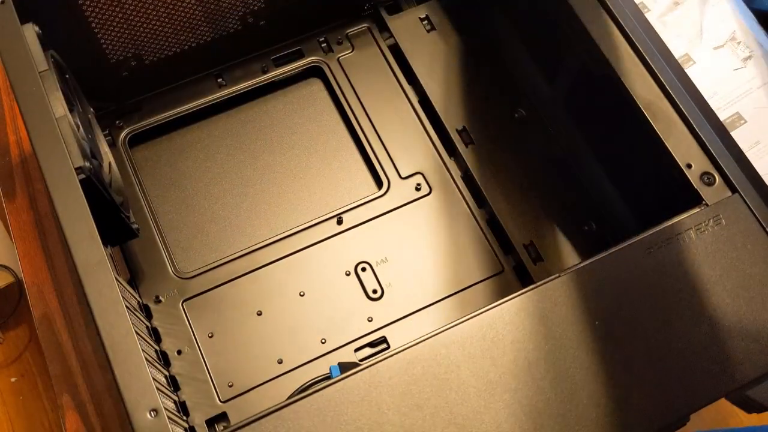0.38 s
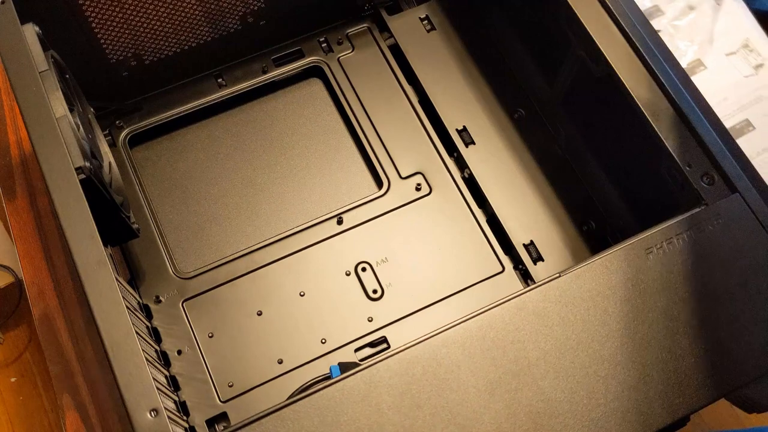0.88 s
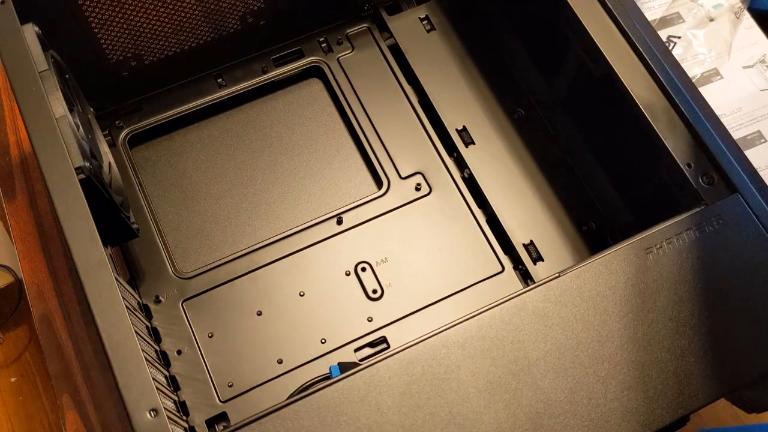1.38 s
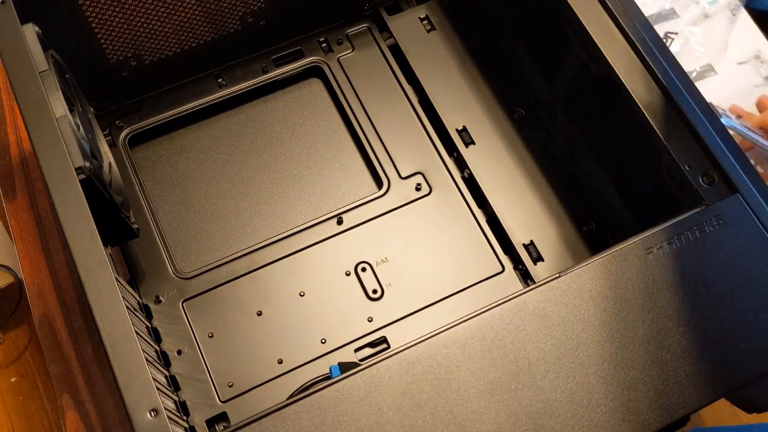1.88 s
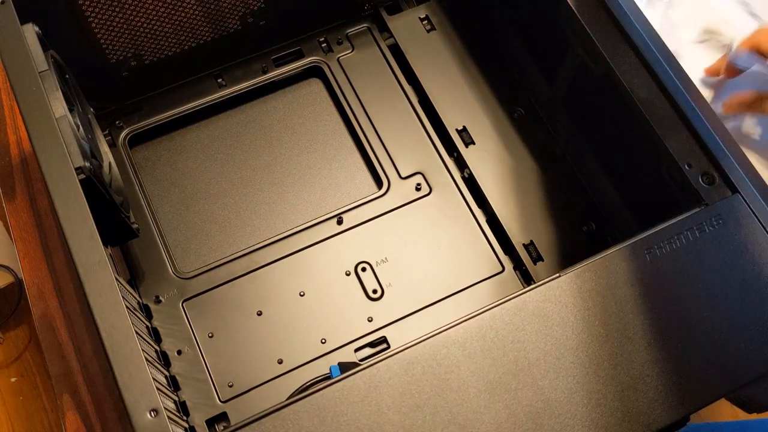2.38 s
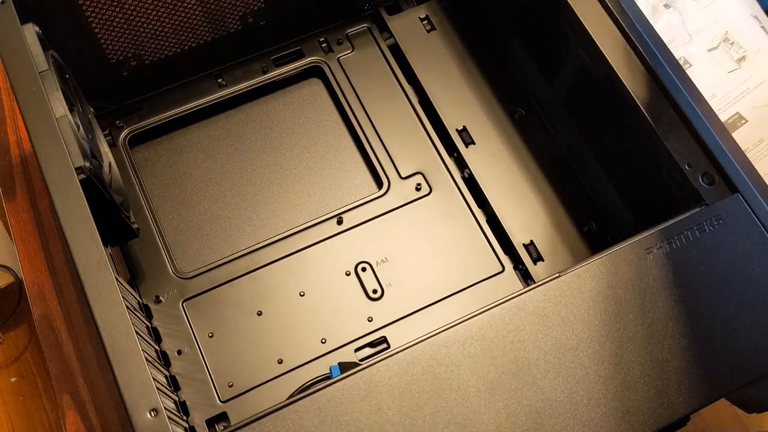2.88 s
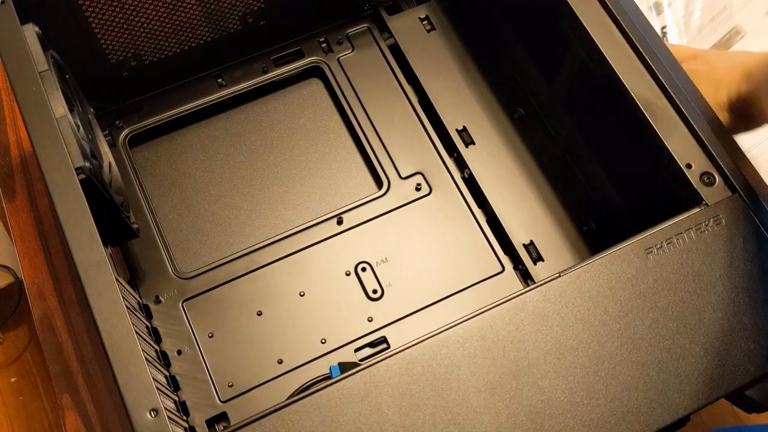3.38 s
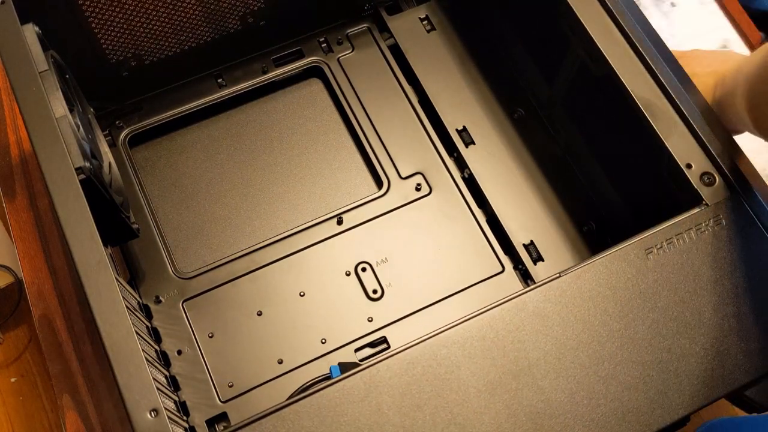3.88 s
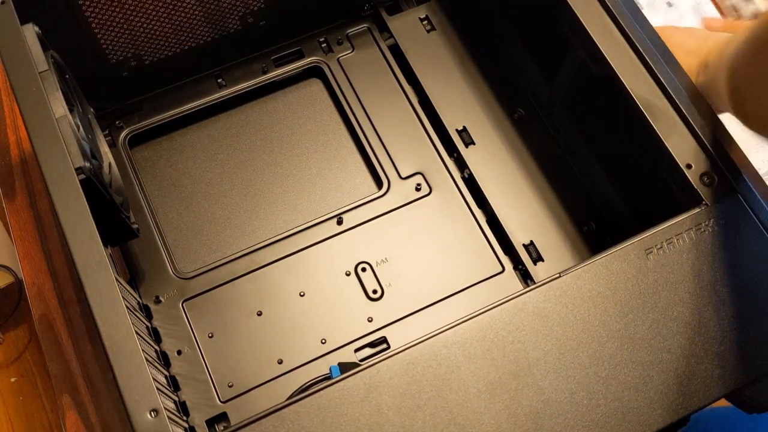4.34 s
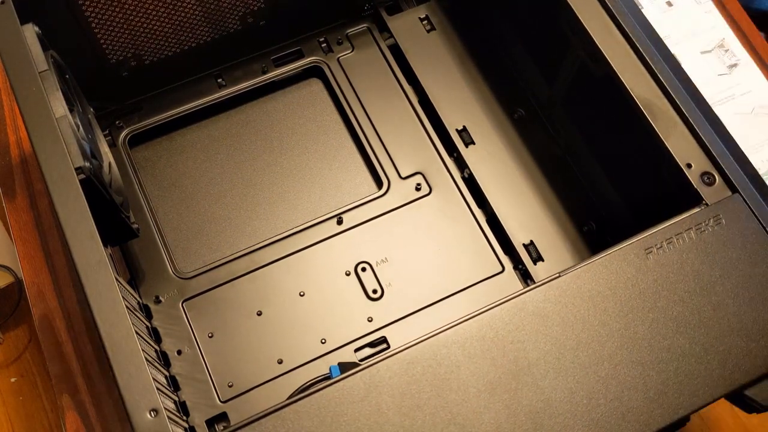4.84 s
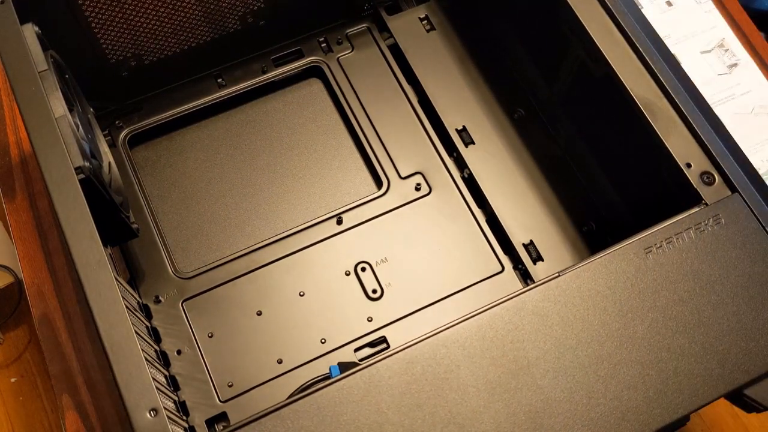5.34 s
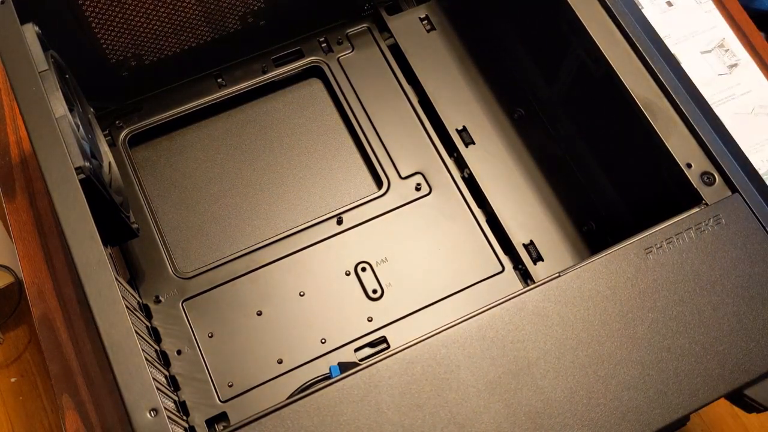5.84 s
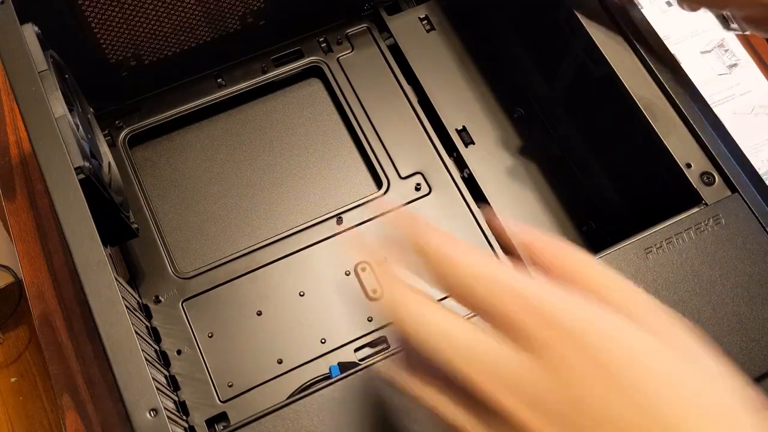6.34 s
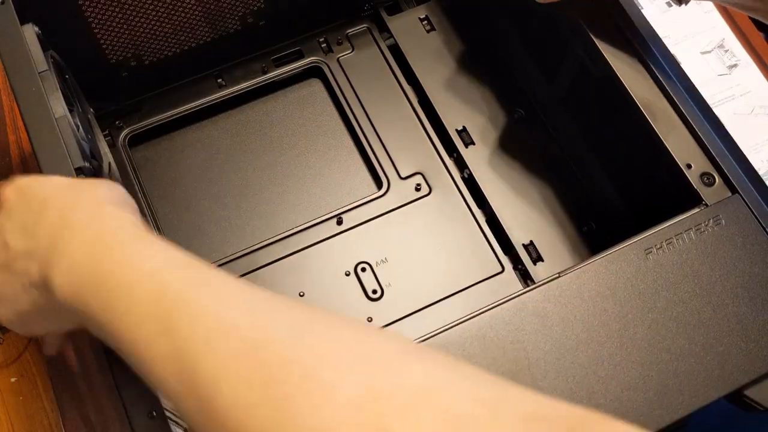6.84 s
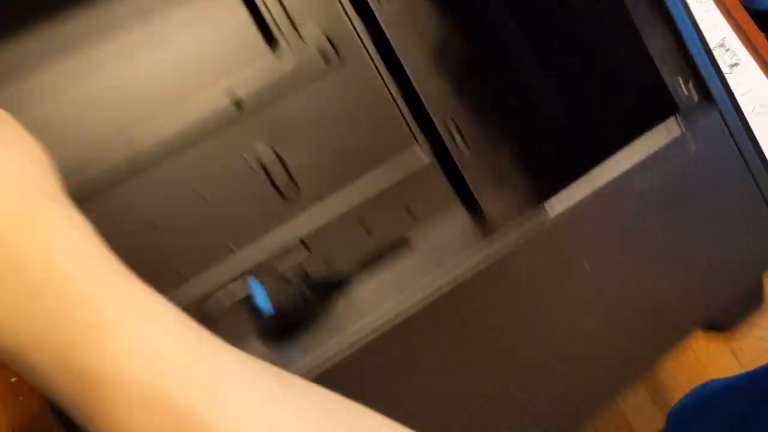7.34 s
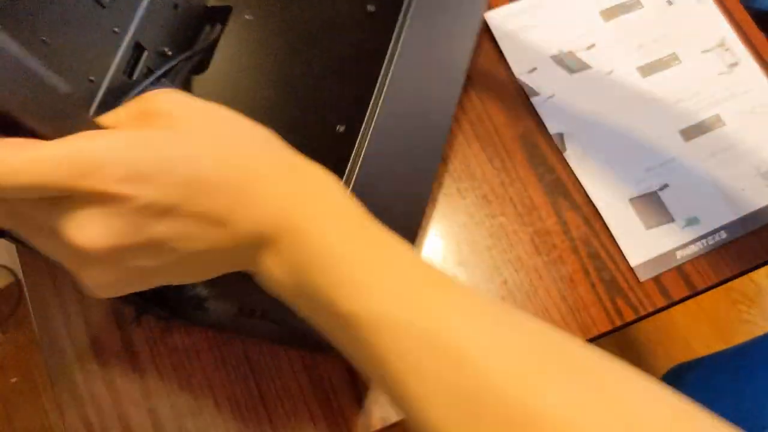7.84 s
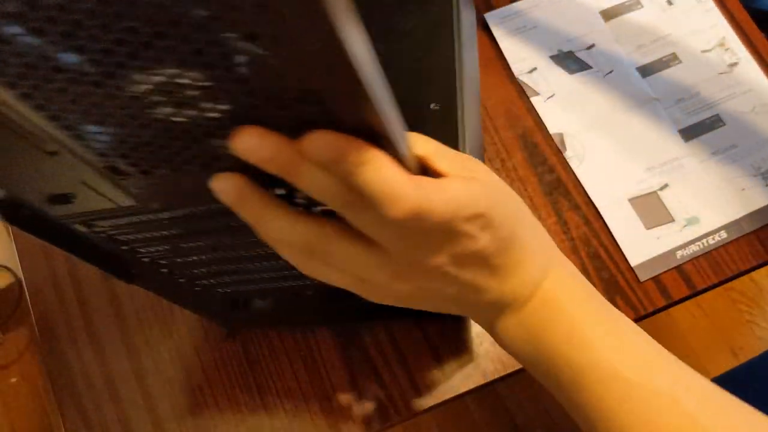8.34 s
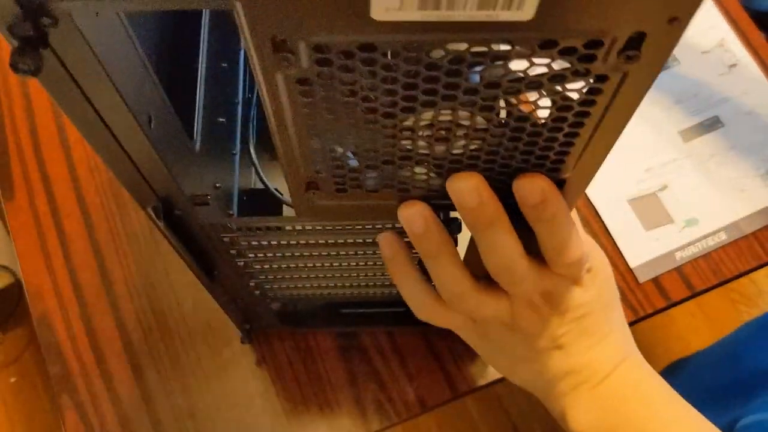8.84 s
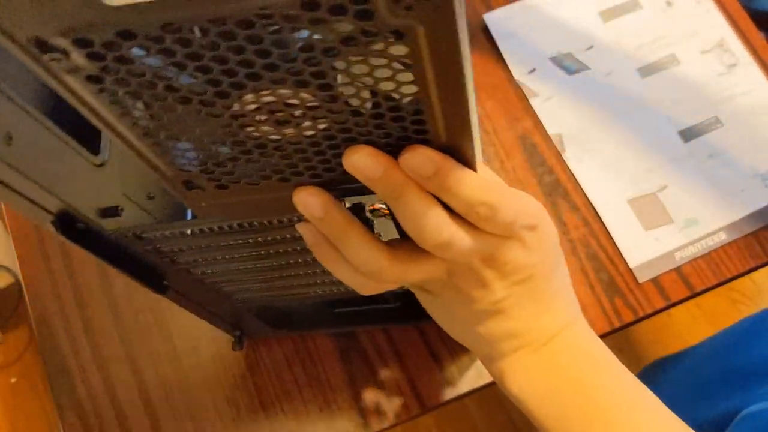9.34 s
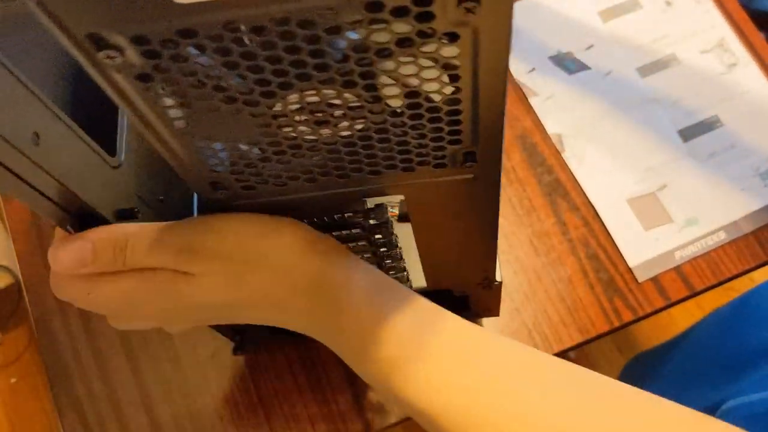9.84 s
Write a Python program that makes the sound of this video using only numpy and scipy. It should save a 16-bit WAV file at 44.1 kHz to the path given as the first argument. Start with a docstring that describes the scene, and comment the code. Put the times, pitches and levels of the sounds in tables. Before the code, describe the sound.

Near-quiet opens with faint rustling, then crisp taps, paper crackle and brief drags on a table. The activity thins to soft rustles. Then hollow steel knocks and a growing scrape lead to one heavy thud with clattering panels and deep table resonance, followed by lighter bumps and fading slides. Close stereo pickup in a small room with short echo and low room noise.

```python
"""On a wooden table in a small room lies a steel computer case; a hand beside it shuffles paper and small parts.
Then two hands grip the case, scrape it round and tip it upright: it thumps down, rings and is nudged into place.
Taps and knocks are noise bursts with one strong ring; rustles and scrapes are noise and random slips that swell
and fade. Ringing tones make the steel panels and the table. A low hum and room noise lie behind it all.
A phone just above the case hears it through two ports."""
import sys
import numpy as np
from scipy import signal
from scipy.fft import rfft, irfft
from scipy.io import wavfile
from scipy.ndimage import uniform_filter1d

SR = 44100
rng = np.random.default_rng(int(sys.argv[2]) if len(sys.argv) > 2 else 0)


def ratio(d):
    """dB to gain"""
    e = np.asarray(d, float) / 20
    return 10 ** e


def generate_wav(signal):
    """Clip the signal to [-1, 1] and save it as 16-bit WAV at the path in sys.argv[1]."""
    frames = np.transpose(np.atleast_2d(signal))
    scaled = np.clip(frames, -1, 1) * 32767
    pcm = np.round(scaled).astype(np.int16)
    wavfile.write(sys.argv[1], SR, pcm)


N = 439236  # samples
T = np.arange(N) / SR  # seconds
GRIP_S, LANDING_S = 6.95, 7.86  # the hands take the case; it lands on its end


def level(x, db):
    """Scale a sound to an rms level in dB."""
    return x * ratio(db) / np.sqrt(np.mean(x ** 2))


def shape(x, table, to=ratio):
    """Weight the spectrum by a table of Hz and value, joined on a log-frequency axis."""
    hz, value = np.transpose(table)
    log_hz = np.log(np.fft.rfftfreq(x.shape[-1], 1 / SR) + 1)
    gain = to(np.interp(log_hz, np.log(hz), value))
    return irfft(rfft(x) * gain, x.shape[-1])


def walk(rate):
    """Random levels held 1 / rate seconds and smoothed twice; their spread is near 1."""
    hold = int(SR / rate)
    steps = np.repeat(rng.standard_normal(N // hold + 1), hold)
    return 1.53 * uniform_filter1d(uniform_filter1d(steps, hold), hold)[:N]


def swells(rows, lift_db=0):
    """Each movement swells from silence to its peak, then fades steadily; their powers add."""
    start, peak_db, rise, fade = np.transpose(rows)[:4, :, None]
    t = T[::32]  # a coarse clock is enough for slow swells
    up = np.clip((t - start) / rise, 0, 1) ** 1.5
    fall_db = 30 * np.maximum(t - start - rise, 0) / fade  # falls 30 dB in one fade time
    power = np.sum((up * ratio(peak_db + lift_db - fall_db)) ** 2, axis=0)
    return np.interp(T, t, np.sqrt(power))


def ring(x, modes):
    """A bank of damped tones, like a struck body; a unit push starts each at its own level."""
    out = 0
    for hz, db, t60 in modes:
        radius = np.exp(-np.log(1000) / (t60 * SR))
        turn = 2 * np.pi * hz / SR
        resonator = [1, -2 * radius * np.cos(turn), radius * radius]
        out = out + ratio(db) * signal.lfilter([0, np.sin(turn)], resonator, x)
    return out


# Colour of the noise as surfaces touch. Each row: frequency in Hz, relative level in dB per Hz.
CONTACT_COLOUR = [(120, -76), (300, -28), (700, -4), (1800, 9), (4000, -10.5), (6000, -18), (12000, -30)]


def blows(rows, tick_colour, ring_share, t60):
    """Each blow: a bright tick, a noisy contact with one strong ring, a push into the table."""
    crack, push = np.zeros(N), np.zeros(N)
    t = T[:SR // 4]
    for start, contact_db, tick_db, thud_db, hz in rows:
        noise = rng.standard_normal((3, len(t)))
        fade = np.exp(-np.log(1000) * t / t60) * np.minimum(t / 0.0012, 1)
        tick = level(shape(noise[0], tick_colour), tick_db + 2.5) * fade ** 2
        contact = level(shape(noise[1], CONTACT_COLOUR), contact_db - 10.0) * fade
        tone = ring_share * ratio(contact_db) * np.sin(2 * np.pi * hz * t) * fade ** .7
        soft_push = ratio(thud_db) * np.exp(-t / .001) * (1 + .6 * noise[2]) / (.005 * SR)
        i = int(start * SR)
        n = min(len(t), N - i)
        crack[i:i + n] += (tick + contact + tone)[:n]
        push[i:i + n] += soft_push[:n]
    return crack, push


# Blows on the case. Each row: start in seconds, contact, tick and thud in dB (settings that blows() scales),
# strongest ring in Hz.
CASE_KNOCKS = [(6.656, -31, -55, -46, 540), (6.708, -45, -57, -44, 734), (6.907, -34.5, -65, -53, 1340),
               (7.094, -41, -40, -52, 4200), (7.121, -31, -42.5, -41, 1380), (7.149, -42, -56, -46, 581),
               (7.275, -19, -46, -56, 1225), (7.317, -15, -55, -50, 1200), (7.366, -11, -32, -57, 1640),
               (7.574, -54, -45, -48, 750), (7.674, -31, -47, -46, 437), (7.799, -36, -55, -52, 480),
               (7.877, -5, -21, -9, 793), (7.933, -15.5, -36, -15, 443), (8.118, -36, -36, -39, 970),
               (8.581, -42, -44.5, -50.5, 1245), (8.832, -25, -35.5, -27, 957),
               (8.872, -18.5, -58, -24, 880), (9.028, -49, -60, -19.5, 581),
               (9.061, -23.5, -37.5, -39, 789), (9.208, -39, -71, -42, 840), (9.549, -53, -54, -47, 650),
               (9.823, -39.5, -49, -49, 1248)]


def knocks():
    """Heavy steel knocks whose contact takes longer to die away than that of light parts."""
    return blows(CASE_KNOCKS, GRIP_COLOUR, ring_share=0.33, t60=0.058)


# Steel panels. Each row: frequency in Hz, relative level in dB, time to fall 60 dB in seconds.
CASE_MODES = [(443, -6.5, 0.2), (480, -8.5, 0.38), (634, -12.5, 0.1), (770, -10, 0.28), (900, -11, 0.052),
              (952, -4.5, 0.074), (1060, -11, 0.095), (1240, -11, 0.17), (1320, -12, 0.082),
              (1452, -14, 0.15), (1640, -23, 0.066), (1870, -29, 0.11), (2080, -10, 0.1), (2310, -20, 0.27),
              (2630, -44, .15), (2920, -40, 0.15), (3200, -38, 0.099), (3060, -38, 0.14), (3420, -17, 0.1),
              (3840, -51, .15)]


def case_panels(x, db):
    """The steel panels of the case ring when pushed."""
    return ratio(db) * ring(x, CASE_MODES)


# Small parts and paper on the table. Each row: start in seconds, contact, tick and thud in dB
# (settings that blows() scales), ring in Hz.
PART_TAPS = [(0.819, -32, -35.5, -55, 870), (0.892, -29, -29.5, -32.5, 1100), (1.039, -13, -12, -47, 799),
             (1.335, -23.5, -29.5, -50, 1095), (1.608, -25, -34, -49, 770), (1.867, -39, -48, -46, 1470),
             (1.889, -18, -13.5, -43, 1360), (1.989, -25, -26, -48, 810), (2.057, -23.5, -28, -33, 960),
             (2.164, -30, -54, -49, 820), (2.341, -29, -32, -53, 1170), (2.386, -25.5, -45, -32.5, 635),
             (2.475, -31, -57, -33.5, 910), (2.607, -26, -64, -32.5, 1320), (2.678, -29, -53, -34, 606),
             (2.798, -29, -50, -33, 600), (2.86, -40, -73, -39, 634), (2.906, -36, -71, -66, 785),
             (2.963, -14, -63, -29, 1600), (3.017, -13, -54, -50, 770), (3.224, -37, -49, -33, 985),
             (3.357, -24, -27, -52, 640), (3.478, -35, -50, -40, 2500), (3.542, -17.5, -50, -35, 2210),
             (3.595, -34, -56, -33, 1150), (3.83, -22.5, -46, -24, 1200), (3.857, -21, -38, -23, 1650),
             (4.294, -41, -57, -57, 2020), (4.494, -27, -36, -53, 2780), (4.561, -34, -39, -48, 1070),
             (4.611, -42, -24, -50, 2020), (4.705, -48, -42, -59, 1640), (4.772, -33, -27, -61, 2640),
             (4.79, -44, -25, -51, 2580), (4.806, -36, -31, -52, 2490), (4.917, -50, -34, -62, 3020),
             (4.931, -28, -29, -52, 1920), (5.416, -39, -34.5, -50, 820), (6.064, -37.5, -59, -30, 690)]


def taps():
    """Light parts click and tap, with a short contact and a papery tick."""
    return blows(PART_TAPS, PAPER_COLOUR, ring_share=0.45, t60=0.024)


# Short creaks. Each row: middle in seconds, peak in dB, pitch in Hz, length in seconds.
CREAK_TONES = [(0.9, -42, 2800, .02), (1.65, -44, 700, .05), (2.404, -41, 630, .067), (5.43, -48, 775, .04),
               (7.371, -20, 1640, .015), (7.388, -27, 412, .025), (8.122, -23, 200, .035),
               (8.203, -36, 1215, .03), (9.331, -38, 1220, .018)]
# The thin panel sings after the heavy landing, then again as the case slides.
# Each row: start in seconds, peak in dB, rise in seconds, fade in seconds.
PANEL_SONG = [(7.877, -44, .004, .4), (8.08, -46, .18, .25), (8.3, -57, .08, .55)]


def creaks():
    """Brief tones from a joint that slips, and a thin panel's long wavering ring, a resonance fed by noise."""
    out = 0
    for middle, db, hz, length in CREAK_TONES:
        bump = np.cos(np.pi * np.clip((T - middle) / length, -.5, .5))
        out = out + ratio(db) * bump * np.sin(2 * np.pi * hz * T)
    song = ring(rng.standard_normal(N), [(3042, 0, .06)])
    return out + level(song, 0) * swells(PANEL_SONG)


def grains(rate, spread_db, bed):
    """Random one-sample slips of scattered size over a noise bed that the two ports hear differently."""
    size = np.minimum(rng.exponential(size=N), 3.2)
    happens = rng.random(N) < rate / SR  # rate: slips a second
    slips = happens * ratio(spread_db * size) * rng.standard_normal(N)
    return level(slips, 0) + bed * rng.standard_normal((2, N))


def chatter(count, t60):
    """Single slips, each ringing briefly at one of many pitches."""
    out = 0
    for hz in np.geomspace(450, 3600, count) * ratio(.3 * rng.standard_normal(count)):
        slips = (rng.random(N) < 30 / SR) * rng.standard_normal(N)
        out = out + ring(slips, [(hz, 0, t60)]) * np.sqrt(450 / hz)
    return level(out, 0)


# Something is dragged or set down. Each row: start in seconds, peak of the dull scrape in dB, rise in seconds,
# fade in seconds, sharper rasp in dB over the dull scrape.
SCRAPE_MOVES = [(0.0, -73, 0.0056, .4, -3), (0.31, -67.5, 0.022, 1.9, -1), (0.5, -69, 0.14, 1.5, -2),
                (0.815, -54, .005, 0.16, -17), (0.875, -50, 0.013, 0.18, 5.5), (0.96, -53, 0.052, .2, 2),
                (1.037, -32.5, 0.0031, 0.13, -1), (1.15, -52.5, 0.029, 0.74, -0.5),
                (1.24, -44, .1, 0.18, -5), (1.35, -49, 0.04, 0.55, 3.5), (1.405, -50.5, 0.012, 1.2, -7),
                (1.606, -36, 0.018, 0.2, -4), (1.888, -39, .004, 0.7, -2.5), (1.97, -45.5, 0.026, 0.2, 5),
                (2.12, -50.5, 0.073, 0.19, 5.5), (2.338, -49.5, 0.0024, 0.13, 6),
                (2.379, -33.5, 0.0075, 0.06, -2), (2.42, -45, 0.075, 0.44, 2), (2.76, -51, 0.16, .2, -7),
                (2.961, -30, 0.0028, 0.14, -8), (3.011, -33, 0.011, 0.21, -5),
                (3.17, -56, 0.07, 0.88, -1.5), (3.355, -36.5, 0.0029, 0.19, 4),
                (3.44, -40.5, 0.038, 0.098, 0), (3.51, -39.5, 0.077, 0.22, 3),
                (3.74, -58.5, 0.066, 0.35, 4), (3.831, -39.5, .004, 0.17, -3.5),
                (3.85, -40.5, 0.019, 0.072, -3), (4.28, -67, 0.017, 0.41, 8), (4.46, -51, 0.088, 0.47, 7),
                (4.771, -49.5, 0.018, 0.25, 3.5), (4.91, -52, 0.017, 0.34, 6), (5.233, -62.5, .01, .3, -7),
                (5.27, -59.5, 0.041, 0.42, 7.5), (5.415, -52, .004, 0.17, -2), (5.74, -68.5, .04, 0.46, 6),
                (6.048, -72, 0.013, 0.56, 9), (6.27, -60.5, 0.045, 0.63, 5), (6.46, -71.5, 0.034, 0.13, 14),
                (6.648, -49, 0.0064, .07, 1), (6.68, -60.5, 0.015, 0.45, 0), (6.84, -53, 0.071, 0.22, -7),
                (7.118, -45, 0.0036, .3, -4.5), (7.2, -29, 0.096, 0.25, -4), (7.28, -32, .04, 0.05, -9),
                (7.362, -26.5, .004, 0.094, -7.5), (7.5, -81, .03, 0.72, 0), (7.665, -41, 0.014, 0.11, -14),
                (7.77, -46, 0.029, 0.13, -15), (7.877, -17, 0.0028, .045, -5),
                (7.9, -26.5, 0.018, 0.27, -0.5), (8.0, -40.5, 0.085, 0.63, 0.5), (8.1, -42, 0.18, 0.24, 0),
                (8.36, -56, 0.05, .4, -17.5), (8.5, -58, 0.094, 0.082, -22),
                (8.829, -32.5, 0.0066, 0.3, -6.5), (8.85, -35.5, 0.044, 0.1, -3.5),
                (9.025, -47, 0.014, 0.44, -4.5), (9.05, -37, 0.024, 0.11, -2),
                (9.315, -58.5, 0.0053, 1.1, -7), (9.42, -56, 0.18, 0.11, -14),
                (9.815, -56, 0.012, 0.3, -5.5), (9.9, -57, .06, .3, -23)]
# Colours of the dull scrape and the sharper rasp. Each row: frequency in Hz, relative level in dB per Hz.
SCRAPE_COLOUR = [(150, -37), (320, -6.5), (500, -2.5), (900, 1), (1500, 2.5), (2000, -20.5), (4000, -71)]
RASP_COLOUR = [(600, -67), (1200, -21.5), (1700, -0.5), (2600, 5), (3600, -5), (4500, -14.5), (8000, -63)]


def scrapes():
    """Dragging sets off dense slips in the middle; once the case is gripped they run through its panels."""
    slips = grains(700, 2.8, 1.3) * ratio(1.3 * walk(25))
    slips = level(shape(slips, [(450, 0), (3600, -9)]), 0) + .4 * chatter(count=30, t60=.022)
    dull = level(shape(slips, SCRAPE_COLOUR), 0) * swells(SCRAPE_MOVES)
    rasp_lift_db = np.array(SCRAPE_MOVES)[:, 4:]
    rasp = level(shape(slips, RASP_COLOUR), 0) * swells(SCRAPE_MOVES, rasp_lift_db)
    scrape = dull + rasp
    return scrape + case_panels(scrape * (T > GRIP_S), -41.5)


# Paper, cloth and skin rustle. Each row is a movement: start in seconds, peak in dB, rise in seconds,
# fade in seconds.
RUSTLE_MOVES = [(0.0, -63, 0.0036, 0.26), (0.31, -62, 0.022, 1.3), (0.55, -54, 0.048, 0.55),
                (0.815, -61, .006, 0.62), (0.875, -49, .018, 0.31), (0.95, -50.5, .07, .2),
                (1.038, -33.5, 0.0035, 0.22), (1.16, -54.5, .05, 1.2), (1.333, -51.5, 0.0089, 0.54),
                (1.405, -48, 0.011, 0.46), (1.5, -48, 0.061, 0.38), (1.606, -39, 0.021, 0.13),
                (1.73, -52, .005, 0.1), (1.888, -38.5, 0.0083, 0.67), (2.0, -38, 0.044, 0.16),
                (2.13, -49.5, 0.03, 0.49), (2.339, -45.5, .004, 0.25), (2.378, -55, 0.012, 0.31),
                (2.43, -42, 0.083, .2), (2.676, -59.5, .004, 0.092), (2.72, -66, 0.025, .4),
                (2.797, -64, .004, 0.38), (2.962, -55, .004, .3), (3.01, -44, .008, 0.25),
                (3.24, -50.5, 0.13, 0.23), (3.356, -33, 0.0028, 0.24), (3.44, -41.5, .04, .13),
                (3.5, -37.5, 0.09, 0.24), (3.74, -88.5, 0.068, 0.36), (3.8, -49, 0.036, 0.23),
                (3.84, -41, 0.029, 0.21), (3.93, -45, 0.055, 0.24), (4.09, -56, 0.015, 0.085),
                (4.28, -58, 0.022, 1.7), (4.43, -39.5, 0.16, 0.3), (4.771, -39.5, 0.031, 0.18),
                (4.91, -36, 0.025, 0.16), (5.0, -53, 0.058, 0.4), (5.233, -48, 0.015, 0.73),
                (5.415, -41.5, .004, 0.082), (5.48, -72, 0.045, 0.15), (5.74, -61.5, 0.037, 0.82),
                (6.05, -58, 0.01, 0.34), (6.27, -55, 0.031, 0.38), (6.45, -54, 0.05, 0.18),
                (6.655, -49, 0.023, 0.31), (6.83, -62.5, 0.073, 1), (7.07, -67, 0.029, .1),
                (7.12, -48, 0.0055, 0.22), (7.2, -37, 0.085, .11), (7.362, -34.5, 0.0023, 0.043),
                (7.375, -45.5, 0.031, 0.16), (7.665, -45, 0.0073, 0.048), (7.78, -54, 0.01, 0.091),
                (7.877, -22, 0.0038, 0.15), (7.9, -25, 0.034, .19), (8.0, -46.5, 0.044, 0.77),
                (8.11, -43, .008, .12), (8.15, -44, 0.043, 0.48), (8.22, -54, 0.068, 0.16),
                (8.57, -78, 0.0064, 0.033), (8.831, -49, .004, 0.47), (8.84, -42.5, 0.049, 0.13),
                (9.05, -44, 0.024, 0.15), (9.315, -59, .005, 0.098), (9.36, -63, 0.0093, 0.17),
                (9.45, -62.5, .01, 0.27), (9.5, -62, 0.095, .04), (9.815, -54, 0.0099, .1),
                (9.85, -56, 0.027, .09)]
# Colours of paper, and of skin on steel. Each row: frequency in Hz, relative level in dB per Hz.
PAPER_COLOUR = [(1200, -20), (2600, 7), (3600, 1.5), (5100, 6), (8200, 1), (12900, -0.5), (16000, -5)]
GRIP_COLOUR = [(1200, -54), (2600, -5), (3600, -6.5), (6000, -4.5), (9000, -15), (13000, -15.5),
               (16000, -22)]


def rustles():
    """Paper crackles in the treble as many tiny slips; after the grip, skin on steel does."""
    crackle = grains(1000, 12.0, 3.6) * ratio(2.1 * walk(30))
    paper = level(shape(crackle, PAPER_COLOUR), 0)
    skin = level(shape(crackle, GRIP_COLOUR), 0)
    return np.where(T > GRIP_S, skin, paper) * swells(RUSTLE_MOVES)


# Table top and the air inside the case, deepest first. Each row: frequency in Hz, relative level in dB,
# time to fall 60 dB in seconds.
TABLE_MODES = [(60, -12, .6), (81, -22, 0.4), (122.4, 2.5, 0.38), (144, -8.5, 0.77), (190, 7, 0.11),
               (224, -7.5, 0.11), (260, 1, 0.18), (301, -4.5, 0.19), (331, 3.5, 0.24), (378, -6.5, 0.22)]
# The table shakes under a weight. Each row: start in seconds, peak in dB, rise in seconds, fade in seconds.
TABLE_SHAKES = [(0.0, -52.5, .005, 1), (1.0, -53.5, 0.065, 0.4), (1.6, -56, .02, 0.36),
                (1.72, -48, 0.034, 0.12), (1.87, -41, 0.11, 0.15), (2.53, -46, 0.035, 0.21),
                (2.94, -37.5, 0.096, 0.18), (3.31, -44, 0.078, 1), (3.5, -43.5, 0.16, .05),
                (3.82, -42, 0.016, 0.24), (3.83, -41, 0.045, .11), (3.95, -55, 0.074, 0.13),
                (4.77, -51, 0.021, .15), (4.87, -48, 0.081, 0.076), (5.39, -53, 0.055, 0.13),
                (6.02, -55, 0.055, .4), (6.64, -44.5, .02, 0.74), (6.94, -51, 0.047, 0.15),
                (7.1, -36.5, 0.025, 0.28), (7.2, -43, 0.071, .3), (7.32, -31.5, 0.064, 0.16),
                (7.65, -41, 0.031, 0.15), (7.78, -42, 0.036, 0.054), (7.877, -20.5, 0.0051, 0.45),
                (8.09, -37.5, 0.027, 0.11), (8.18, -39, 0.048, 0.46), (8.8, -36.5, 0.045, 0.37),
                (9.02, -36, 0.035, 0.26), (9.8, -50, 0.053, 0.71)]


def shaking():
    """The table rumbles under a moving weight; resting hands keep it faintly moving."""
    # hands on the table damp its modes; only the case's weight shakes the deep ones
    damped = [(hz, db, 0.21 * t60) for hz, db, t60 in TABLE_MODES]
    shake = rng.standard_normal(N)
    heavy = level(ring(shake, damped[1:]), 0)
    light = level(ring(shake, damped[3:]), 0)
    restless = ratio(-56 + 2.5 * walk(9))
    weight = np.hypot(swells(TABLE_SHAKES), restless)
    return np.where(T > LANDING_S, heavy, light) * weight * ratio(1.3 * walk(15))


# How well the table top sends out sound. Each row: frequency in Hz, gain in dB.
TABLE_RADIATION = [(25, -30), (55, -8), (95, -7), (118, 0), (2000, 0)]


def table_top(tap_push, knock_push):
    """Pushes ring the wood, which radiates little deep bass."""
    # light parts do not reach the table's deepest modes
    struck = ring(tap_push, TABLE_MODES[3:]) + ring(knock_push, TABLE_MODES)
    return shape(struck + shaking(), TABLE_RADIATION)


# Where the hands work. Each row: time in seconds, left minus right in dB before the phone shades the left.
HAND_PLACE = [(0, 4), (1, 1), (1.5, 2), (2, 1.5), (3, 3), (4, 1), (5, 1.5), (6.5, 4), (7.8, 3), (8.2, 4),
              (8.8, -0.5), (9.96, 0)]


def place(x):
    """The side nearer the hands is louder."""
    db = np.interp(T, *np.transpose(HAND_PLACE))
    return x * ratio(np.array([db, -db]) / 2)


# The phone's body shades the left port. Each row: frequency in Hz, gain in dB.
LEFT_PORT_SHADE = [(1200, -2), (5000, -7.5), (14000, -8.5)]


def ports(near):
    """The left port hears later and duller than the right."""
    table_side_lag, case_lag = 9, 3  # samples
    left = np.where(T < GRIP_S, np.roll(near[0], table_side_lag), np.roll(near[0], case_lag))
    return np.array([shape(left, LEFT_PORT_SHADE), near[1]])


# How long the room echoes. Each row: frequency in Hz, time to fall 60 dB in seconds.
ROOM_T60 = [(100, 0.31), (400, 0.2), (1500, 0.26), (5000, 0.29), (14000, 0.2)]


def room(x):
    """Diffuse echo, each octave dying at its own rate; the bass is nearly the same at both ports."""
    t, echo = T[:SR // 2], 0
    hz_t60, t60 = np.transpose(ROOM_T60)
    for hz in 60 * 2. ** np.arange(9):
        octave = [(hz / 2, -40), (hz / 1.227, -3), (hz, 0), (hz * 1.28, -3), (hz * 2, -40)]
        band = shape(rng.standard_normal((2, len(t))), octave)
        apart = np.clip((hz / 900) ** 2, .15, 1)
        both = band[0] + apart * band[1] * np.array([[1], [-1]])
        echo = echo + both * np.exp(-np.log(1000) * t / np.interp(np.log(hz), np.log(hz_t60), t60))
    echo = echo * np.minimum(t / 0.0036, 1)
    echo = echo * ratio(-7) / np.sqrt(np.sum(echo ** 2) / 2)  # total echo energy -7 dB
    return signal.fftconvolve(x.mean(axis=0, keepdims=True), echo, axes=1)[:, :N]


# Colour of the room noise. Each row: frequency in Hz, relative level in dB per Hz.
AIR_COLOUR = [(12, -41), (20, -72), (53, 3), (96, -11.5), (168, 0.5), (234, -4.5), (347, -13.5),
              (459, -13.5), (624, -14), (976, -22), (1480, -19.5), (1660, -23.5), (4540, -35.5),
              (13500, -40.5), (16000, -42)]
# Likeness of left and right in the room noise. Each row: frequency in Hz, likeness from 0 to 1.
AIR_LIKENESS = [(60, 0.9), (130, 1), (290, 0.91), (640, 0.43), (1410, 0.06), (3100, 0), (6820, 0.04),
                (15000, 0)]
# Appliance hum. Each row: frequency in Hz, amplitude in dB before it wavers.
HUM_TONES = [(56, -65)]


def air():
    """Room noise, alike left and right in the bass, unrelated in the treble, over a wavering hum."""
    noise = rng.standard_normal((2, N))
    mid = shape(noise[0], AIR_LIKENESS, lambda c: np.sqrt(1 + c))
    side = shape(noise[1], AIR_LIKENESS, lambda c: np.sqrt(1 - c))
    hiss = shape(np.array([mid + side, mid - side]), AIR_COLOUR)
    out = level(hiss, -54.5) * ratio(.8 * walk(3))
    for hz, db in HUM_TONES:
        out = out + ratio(db + 4.1 * walk(12)) * np.sin(2 * np.pi * hz * T)
    return out


def scene():
    """Taps, knocks and hand noise in the room; the table's sound starts out alike for both ports."""
    tap_sound, tap_push = taps()
    knock_sound, knock_push = knocks()
    struck = tap_sound + knock_sound + case_panels(knock_sound, -39.5)
    near = place(struck + creaks() + rustles() + scrapes())
    near = near + table_top(tap_push, knock_push)
    return ports(near) + room(near) + air()


def band_limit(x):
    """A steep low-pass at the top of the band."""
    return signal.sosfilt(signal.butter(12, 16800, fs=SR, output="sos"), x)


def record(dry):
    """The microphone loses the deepest bass and the top."""
    bass_cut = signal.butter(2, 42, "high", fs=SR, output="sos")
    top_cut = signal.ellip(8, .2, 70, 15900, fs=SR, output="sos")
    mix = signal.sosfilt(np.vstack([bass_cut, top_cut]), dry)
    return band_limit(mix)


dry = scene()
out = record(dry)
generate_wav(out)
```